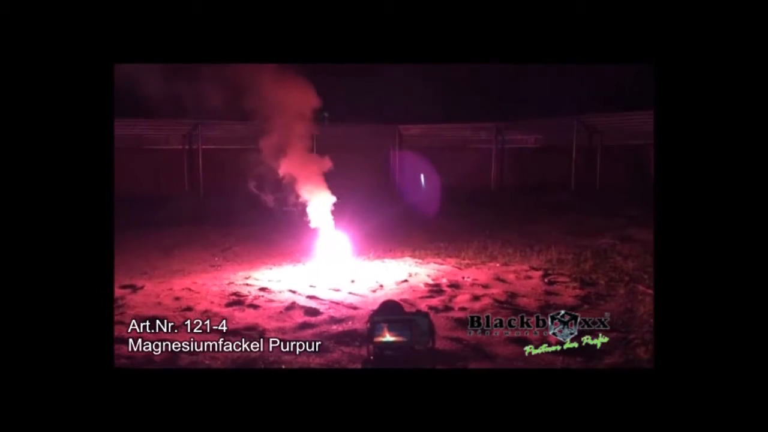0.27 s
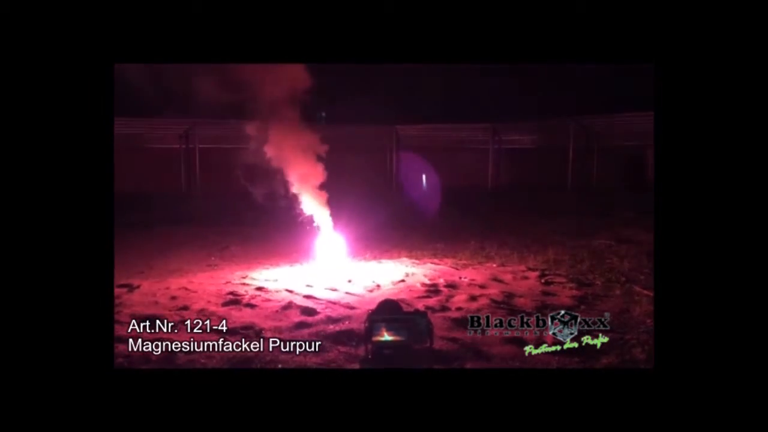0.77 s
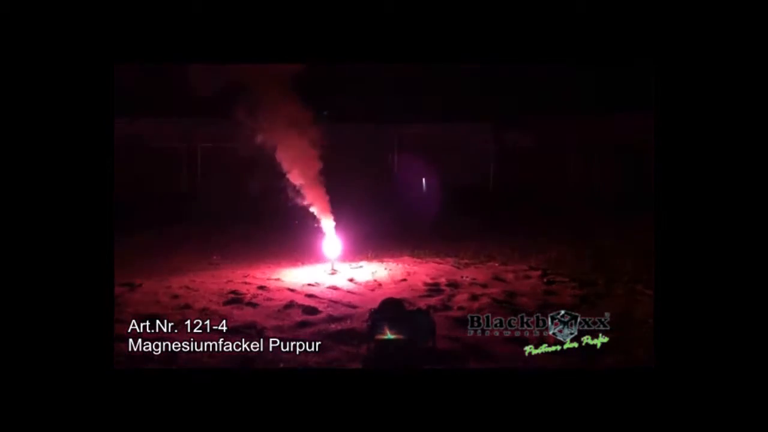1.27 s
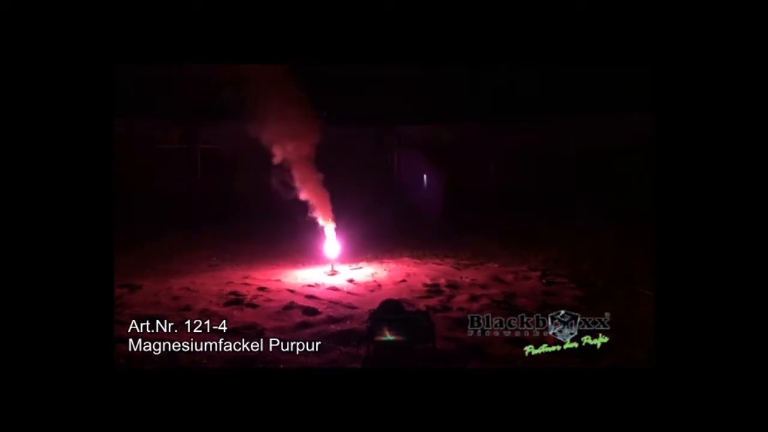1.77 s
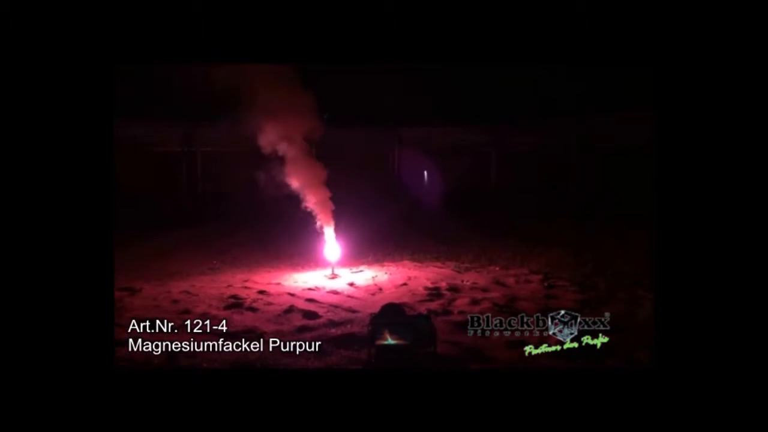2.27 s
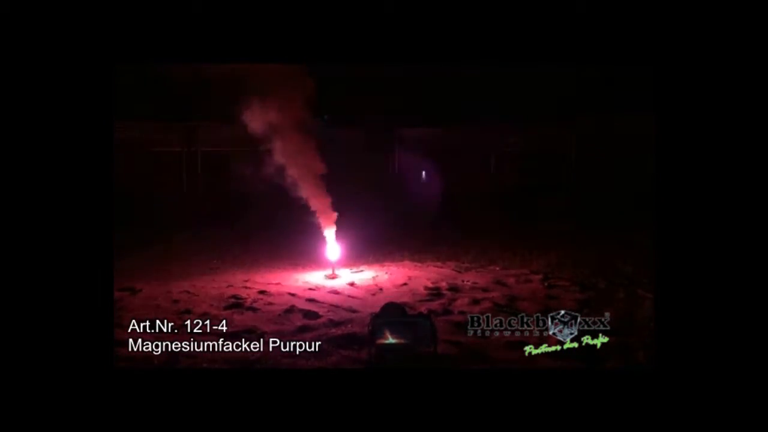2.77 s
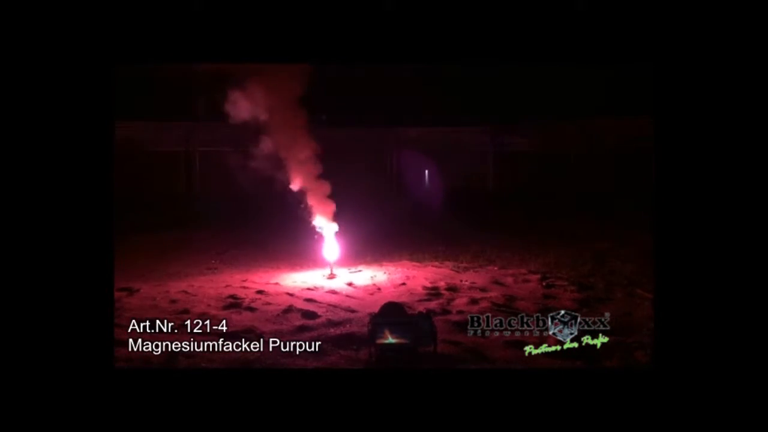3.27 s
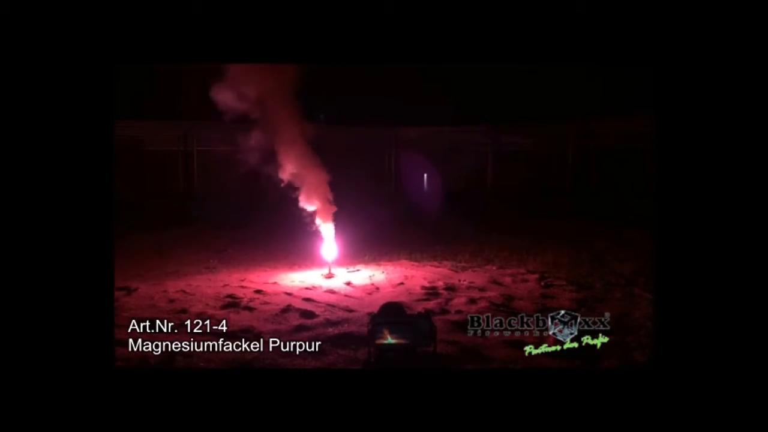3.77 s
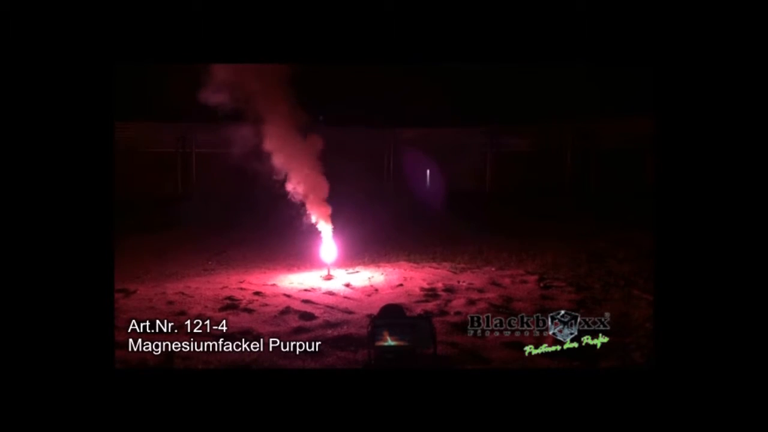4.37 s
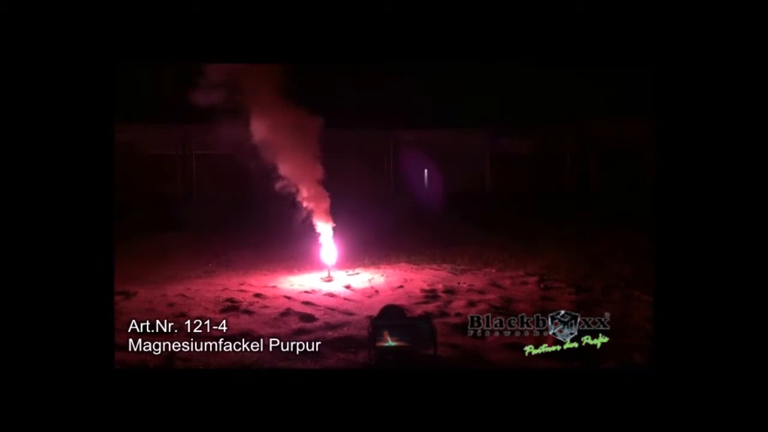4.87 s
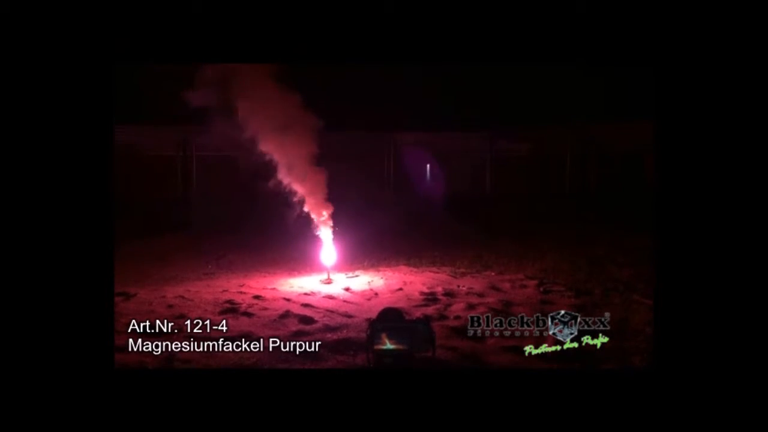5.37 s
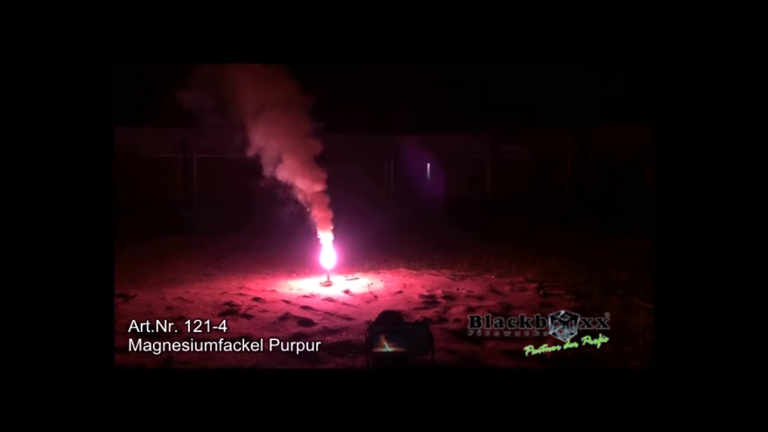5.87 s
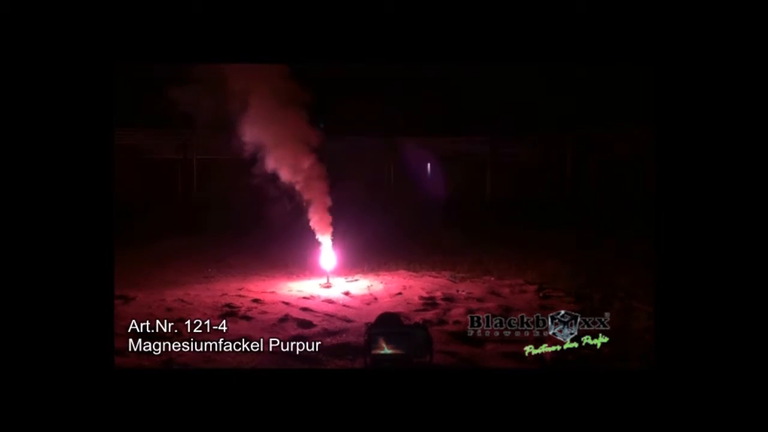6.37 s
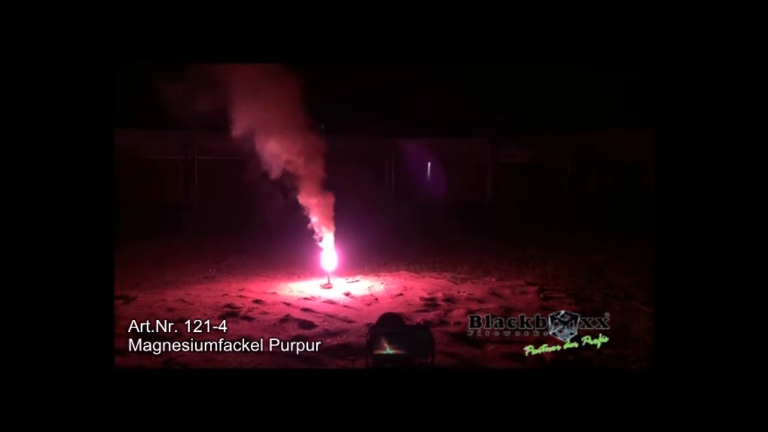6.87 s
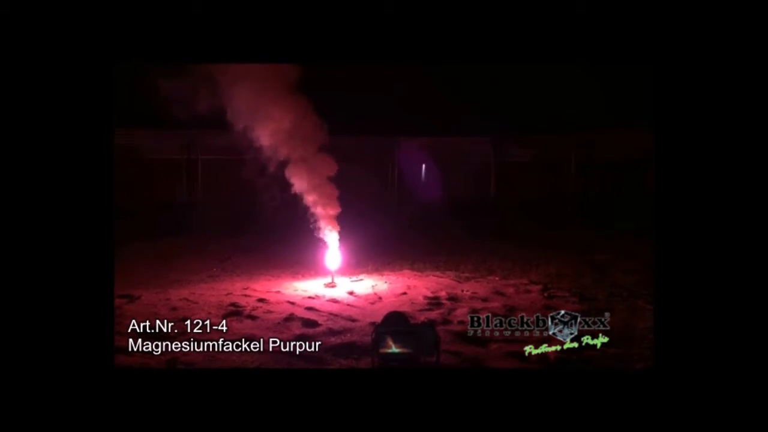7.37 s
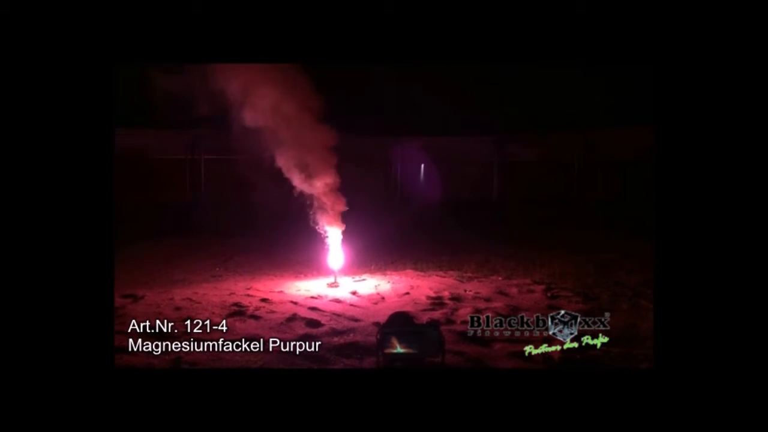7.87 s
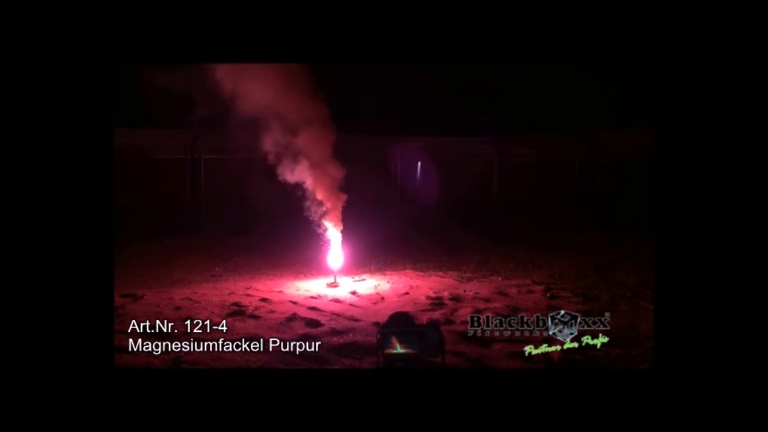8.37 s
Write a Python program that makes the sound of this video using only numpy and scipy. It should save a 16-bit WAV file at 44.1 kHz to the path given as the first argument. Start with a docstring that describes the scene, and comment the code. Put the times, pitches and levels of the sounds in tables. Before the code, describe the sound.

A magnesium flare, already burning, hisses steadily a few metres from the microphone on open ground. Dense grainy fizz dominates, with a low flame rumbling and fluttering underneath. Rare tiny ticks and soft low whumps come and go. Around five seconds the flame surges with a few dull pops, another follows at six, and the hiss slides gradually from bright to lower and hollower. A distant machine hums very faintly.

```python
"""A magnesium flare burns on open ground at night, a few metres from a mono microphone.
From the start gas hisses and fizzes out of its tube, flame rumbles and flaps above, a far machine hums faintly.
Sparks tick and balls of gas whump now and then, while the tube's broad resonance sinks from 8 kHz.
Around 5 s the flame surges and soft pops break out, with one more at 6 s; the flapping slowly grows.
In the last second the resonance rests near 4 kHz. Noise is shaped by spectra and level curves; the hum is sines."""
import sys
import numpy as np
from scipy import signal
from scipy.fft import rfft, irfft
from scipy.io import wavfile
from scipy.ndimage import uniform_filter1d

SR = 44100
rng = np.random.default_rng(int(sys.argv[2]) if len(sys.argv) > 2 else 0)


def dump(signal):
    """Clip the signal to [-1, 1] and save it as 16-bit WAV at the path in sys.argv[1]."""
    limited = np.clip(np.atleast_2d(signal).T, -1, 1)
    pcm = np.round(limited * 32767).astype(np.int16)
    wavfile.write(sys.argv[1], SR, pcm)


N = 381024
TIME = np.arange(N) / SR  # seconds


def from_db(db):
    """Decibels to gain."""
    return 10 ** (np.asarray(db) / 20)


def rms_one(x):
    """Scale to rms 1."""
    return x / np.sqrt(np.mean(x ** 2) + 1e-20)


def in_time(rows, when):
    """The columns of a curve, joined by straight lines, at the given times."""
    seconds, *columns = np.transpose(rows)
    return [np.interp(when, seconds, column) for column in columns]


def at_hz(points, hz):
    """A spectrum's dB, joined on a log-frequency axis."""
    known_hz, level_db = np.transpose(points)
    return np.interp(np.log(np.maximum(hz, 1)), np.log(known_hz), level_db)


def coloured(x, spectrum):
    """Give a signal a spectrum; rms 1."""
    hz = np.fft.rfftfreq(N, 1 / SR)
    return rms_one(irfft(rfft(x) * from_db(at_hz(spectrum, hz)), N))


def drift(rate_hz):
    """Slow chance with about this many swings a second; rms 1."""
    # made at a sixteenth of the sample rate, then joined up
    hz = np.fft.rfftfreq(N // 16, 16 / SR)
    noise = rng.standard_normal(N // 16)
    slow = irfft(rfft(noise) / (1 + (hz / rate_hz) ** 2))
    return np.interp(TIME, np.linspace(0, N / SR, len(slow)), rms_one(slow))


def patches(x, depth_db, per_s, width_hz, count=10):
    """Neighbouring frequency bands swell and fade on their own, like eddies of different sizes; rms 1."""
    spectrum = rfft(x)
    place = np.minimum(np.fft.rfftfreq(N, 1 / SR) / width_hz, count - 1)
    total = np.zeros(N)
    for k in range(count):
        # triangular bands overlap and add up to the whole
        share = np.maximum(1 - np.abs(place - k), 0)
        total += irfft(spectrum * share, N) * from_db(depth_db * drift(per_s))
    return rms_one(total)


def bursts(events, decay_s):
    """An envelope that jumps to each event's level and dies away."""
    total = 1e-18
    for start_s, db in events:
        age = TIME - start_s
        total = total + from_db(db) * (age >= 0) * np.exp(-np.abs(age) / decay_s)
    return total


# The far machine's tones. Each row: frequency in Hz, rms level in dB before the waver.
HUM_TONES = [(98.8, -59.5), (196.8, -64.5)]


def hum(waver_db, wander):
    """A far machine: two low tones share a slight pitch wander and waver in strength on their own."""
    run_s = np.cumsum(1 + wander * drift(2.13)) / SR  # running time, bent by the wander
    total = np.zeros(N)
    for hz, db in HUM_TONES:
        strength = np.sqrt(2) * from_db(db + waver_db * drift(1))
        total += strength * np.sin(2 * np.pi * hz * run_s)
    return total


def eddies(spectrum, even_s):
    """Turbulence of steady strength: its level is evened over even_s."""
    x = coloured(rng.standard_normal(N), spectrum)
    power = uniform_filter1d(x ** 2, max(int(even_s * SR), 2))
    return x / np.sqrt(power + 1e-9)


# How hard the flame churns. Each row: time in seconds, level change in dB.
FLAME_CHURN = [(0.0, 0.7), (0.4, -0.1), (1.15, -0.4), (2.0, -0.7), (2.85, 0.3), (3.55, -2), (3.95, 0),
               (4.4, -0.2), (4.7, -2.3), (5.02, 3), (5.25, -1.5), (6.05, 0.7), (6.75, -0.5), (7.6, 1),
               (8.64, -1.4)]
# Moments when the flame billows (+) or slackens (-).
# Each row: centre in seconds, length in seconds, level change in dB.
BILLOWS = [(0.143, 0.044, 6), (1.007, 0.031, 8.5), (1.146, 0.052, -8), (1.39, 0.06, 2), (2.28, 0.04, 3),
           (2.612, 0.04, 8), (2.773, 0.033, 9), (2.918, 0.051, 4.5), (3.586, 0.093, -5), (3.992, 0.04, 6),
           (5.7, 0.04, 5), (5.94, 0.044, 4), (6.074, 0.023, 7)]
# Spectrum of the big eddies. Each row: frequency in Hz, relative level in dB.
RUMBLE_SPECTRUM = [(15, -21), (30, -23), (42, -11), (53, -6), (88, -2), (110, 0), (150, -2), (195, -6),
                   (250, -9), (330, -15.5), (500, -37.5), (1000, -64)]
# Spectrum of the small eddies. Each row: frequency in Hz, relative level in dB.
FLAP_SPECTRUM = [(150, -33), (280, -1), (380, -1), (520, 0), (630, 0), (810, -5.5), (920, -5.5), (1010, -5),
                 (1110, -10), (1320, -6.5), (1550, -10.5), (2500, -39), (6000, -44)]
RUMBLE_DB, RUMBLE_FLICKER_DB = -52, 1.8  # big eddies, before churn and billows
FLAP_DB, FLAP_FLICKER_DB = -58.5, 1.45  # small eddies, likewise, at the start
FLAP_GROWTH_DB_PER_S = 0.16  # the flame flaps more as the charge burns down
FLAP_FOLLOWS = 0.42  # share of a billow's dB that reaches the small eddies


def flame():
    """Big eddies rumble and small ones flap; both follow the churn, swell with each billow and flicker."""
    churn_db, = in_time(FLAME_CHURN, TIME)
    billow_db = sum(db * np.exp(-(2 * (TIME - s) / length) ** 2) for s, length, db in BILLOWS)
    rumble_db = RUMBLE_DB + churn_db + billow_db + RUMBLE_FLICKER_DB * drift(7.5)
    flap_db = FLAP_DB + FLAP_GROWTH_DB_PER_S * TIME + churn_db
    flap_db = flap_db + FLAP_FOLLOWS * billow_db + FLAP_FLICKER_DB * drift(18)
    rumble = eddies(RUMBLE_SPECTRUM, even_s=0.17)
    flap = patches(eddies(FLAP_SPECTRUM, even_s=0.076), depth_db=2.5, per_s=16, width_hz=140, count=8)
    return from_db(rumble_db) * rumble + from_db(flap_db) * flap


# Balls of gas that flare up. Each row: start in seconds, level in dB before the common trim.
WHUMPS = [(0.267, -39), (0.59, -34.5), (0.638, -36), (2.292, -34.5), (2.481, -37), (4.872, -38),
          (5.968, -40), (6.191, -35.5), (8.248, -38)]


def whumps(trim_db, pitch_hz, swell_s):
    """A ball of gas swells and collapses: one or two low pressure swings."""
    out = np.zeros(N)
    phases = rng.uniform(0, 2 * np.pi, len(WHUMPS))
    for (start_s, db), phase in zip(WHUMPS, phases):
        age = TIME - start_s - swell_s  # zero at the fullest swell
        swell = np.exp(-(age / swell_s) ** 2)
        out += from_db(db + trim_db) * swell * np.sin(2 * np.pi * pitch_hz * age + phase)
    return out


# Gas pockets that catch fire. Each row: start in seconds, level in dB before the common trim.
POPS = [(4.94, -40), (5.021, -34.5), (5.043, -37.5), (6.068, -38)]


def pops(trim_db, decay_s, low_hz, high_hz):
    """A gas pocket catches fire with a soft pop: a short dull burst of noise in the flame."""
    dull = signal.butter(2, [low_hz, high_hz], "band", fs=SR, output="sos")
    noise = rms_one(signal.sosfilt(dull, rng.standard_normal(N)))
    return from_db(trim_db) * bursts(POPS, decay_s) * noise


# The clearest spark ticks. Each row: start in seconds, level in dB before trim and filter.
SPARKS = [(0.2264, -28), (1.8134, -34), (2.0304, -25), (3.3624, -28), (4.2817, -28)]


def sparks(trim_db, decay_s, low_hz):
    """Now and then a glowing crumb bursts with a tiny bright tick."""
    thin = signal.butter(2, low_hz, "high", fs=SR, output="sos")
    ticks = bursts(SPARKS, decay_s) * rng.standard_normal(N)
    return from_db(trim_db) * signal.sosfilt(thin, ticks)


def grains(per_s, spread_db):
    """Clicks at random moments, many small and a few large; rms 1."""
    born = rng.random(N) < per_s / SR
    size = np.minimum(rng.exponential(1, N), 6)
    sign = rng.choice([-1, 1], N)
    return rms_one(born * from_db(spread_db * size) * sign)


def fizz(grain_db, sputter_db, shiver_db, patchy_db):
    """Rushing gas and countless metal grains flashing off; the charge burns unevenly."""
    rush = rng.standard_normal(N)
    mix = rush + from_db(grain_db) * grains(per_s=4000, spread_db=2.6)
    sizzle = patches(mix, depth_db=patchy_db, per_s=31, width_hz=2020, count=7)
    uneven_db = sputter_db * drift(16) + shiver_db * drift(150)
    return rms_one(sizzle * from_db(uneven_db))


# Strength of the gas jet, before its spectrum and resonance are added.
# Each row: time in seconds, level in dB per Hz, extra treble in dB.
JET_STRENGTH = [(0.0, -80.3, 2.2), (0.3, -80.5, 0.6), (1.3, -81.0, 0), (2.1, -80.5, 0.9), (2.75, -80, -0.5),
                (3.2, -81, -0.5), (3.75, -81.5, 0), (4.2, -81, -1), (4.75, -81, -1.5), (5.0, -80.5, -0.6),
                (6.1, -80, -0.9), (6.7, -81.0, 1.0), (7.6, -81, 2), (7.9, -79.9, -0.3), (8.15, -81, -0.2),
                (8.64, -81.3, -0.5)]
# The hollow above the burning face deepens. Each row: time in seconds, resonance in Hz.
MOUTH_RESONANCE = [(0.0, 7950), (1.0, 7800), (2.0, 6800), (3.0, 6600.0), (4.0, 6250.0), (4.8, 6100),
                   (5.1, 5740.0), (6.0, 5330), (7.0, 4450), (8.0, 4200), (8.64, 4200)]
MOUTH_DB, MOUTH_OCTAVES = 9, 0.7  # peak lift; distance from the peak at which half of its dB remain
# The jet's own spectrum. Each row: frequency in Hz, relative level in dB.
HISS_SPECTRUM = [(1300.0, -9), (1750.0, -7), (2150.0, 0.1), (3000.0, -1.35), (3900.0, -2.5), (4600.0, -0.5),
                 (5700.0, -3.5), (6500.0, -6.5), (8300.0, -6), (9500.0, -9), (13000.0, -6), (15300.0, -8)]


def jet(source, treble_hz, lowest_hz):
    """The fizz leaves through the tube's mouth, whose resonance glides down almost an octave."""
    hz, when, frames = signal.stft(source, SR, nperseg=1024, noverlap=768)
    hz = np.maximum(hz, 1)[:, None]
    level_db, treble_db = in_time(JET_STRENGTH, when)
    mouth_hz, = in_time(MOUTH_RESONANCE, when)
    mouth_db = MOUTH_DB / (1 + (np.log2(hz / mouth_hz) / MOUTH_OCTAVES) ** 2)
    treble_share = 1 / (1 + (treble_hz / hz) ** 4)
    # so narrow a jet radiates no bass
    radiation = 1 / np.sqrt(1 + (lowest_hz / hz) ** 8)
    gain_db = at_hz(HISS_SPECTRUM, hz) + level_db + mouth_db + treble_db * treble_share
    _, hiss = signal.istft(frames * radiation * from_db(gain_db), SR, nperseg=1024, noverlap=768)
    # the source has rms 1 over the whole band: bring it to 0 dB per Hz
    return np.sqrt(SR / 2) * hiss[:N]


def scatter(x, level_db, decay_s):
    """The lumpy ground and things lying near add a short spray of weak echoes to the hiss."""
    lag = TIME[:SR // 5]
    echoes = rng.standard_normal(len(lag)) * np.exp(-lag / decay_s) * (lag > .002)
    echoes = echoes / np.linalg.norm(echoes)
    return x + from_db(level_db) * signal.fftconvolve(x, echoes)[:N]


# Steady peaks and notches on the way into the microphone.
# Each row: centre in Hz, width in Hz, lift (+) or cut (-) in dB.
PATH_COLOUR = [(345, 50, -2.8), (420, 50, 2), (490, 60, -1.5), (830, 120, -1.5), (1010, 70, 2),
               (1315, 140, -10.5), (1490, 60, -1.5), (1690, 130, -2.5), (2025, 70, -2.5), (2390, 260, 2.2),
               (3310, 230, -3.2), (3510, 190, 2), (3745, 150, -6.6), (4180, 80, -2), (4930, 120, -1.5),
               (6370, 110, -7.5), (6780, 110, -3), (7260, 140, -2), (7630, 500, -3), (9200, 200, -2),
               (9600, 400, 2.9), (10360, 390, -3.7), (11050, 500, 1.2), (11900, 600, -1.3),
               (13640, 360, -2.5)]
GROUND_DELAY_S, GROUND_SHARE = 0.000378, 0.1  # the bounce: lag, gain


def path(x):
    """A bounce off the ground combs the sound; steady peaks and notches colour it further."""
    hz = np.fft.rfftfreq(N, 1 / SR)
    bounce = 1 + GROUND_SHARE * np.exp(-2j * np.pi * hz * GROUND_DELAY_S)
    colour_db = sum(db / (1 + (2 * (hz - centre) / width) ** 2) for centre, width, db in PATH_COLOUR)
    return irfft(rfft(x) * bounce * from_db(colour_db), N)


def scene():
    """Hum, flame and jet, the same in both channels."""
    machine = hum(waver_db=0.6, wander=0.00637)
    fire = flame() + whumps(trim_db=-4.5, pitch_hz=166, swell_s=0.0065)
    fire = fire + pops(trim_db=-9, decay_s=.008, low_hz=300, high_hz=1100)
    source = fizz(grain_db=-7.5, sputter_db=0.33, shiver_db=0.43, patchy_db=0.86)
    hiss = jet(source, treble_hz=6800, lowest_hz=1280)
    hiss = hiss + sparks(trim_db=3, decay_s=.0003, low_hz=5000)
    mono = path(scatter(hiss, level_db=-17, decay_s=0.016) + fire) + machine
    return np.stack([mono, mono])


CUTOFF_HZ = 15330


def record(dry):
    """The top is cut steeply."""
    lowpass = signal.firwin(801, CUTOFF_HZ, fs=SR, window="blackman")
    return signal.fftconvolve(dry, lowpass[None], "same", axes=1)


dry = scene()
out = record(dry)
dump(out)
```